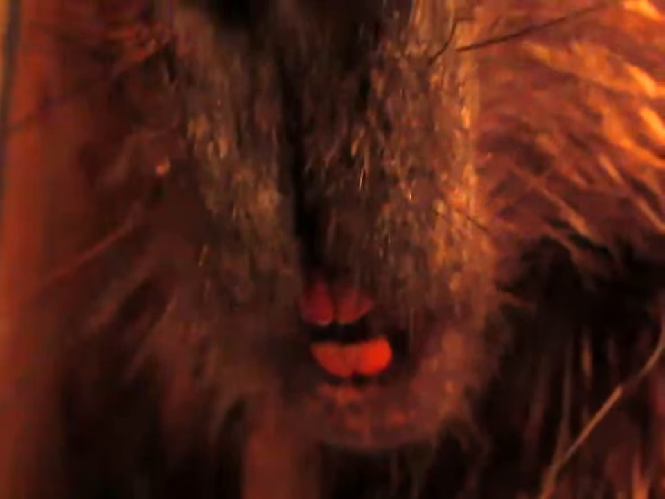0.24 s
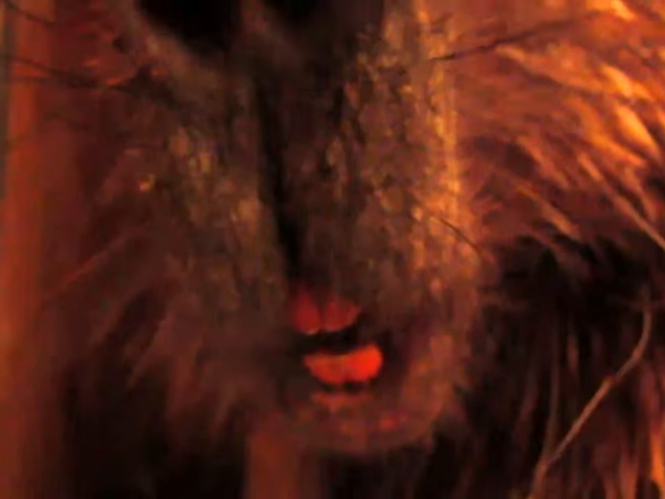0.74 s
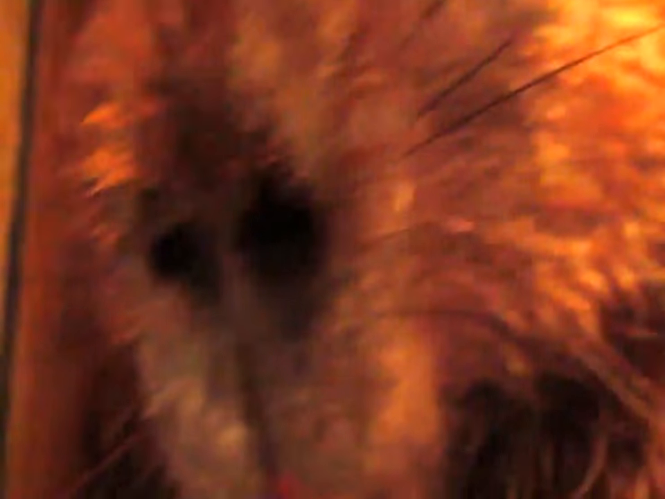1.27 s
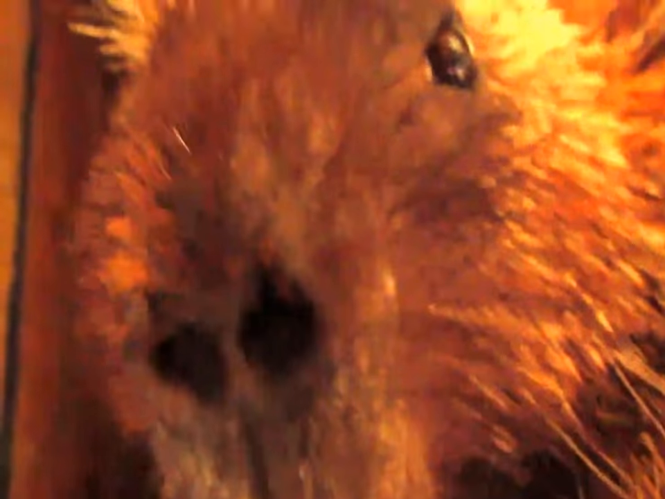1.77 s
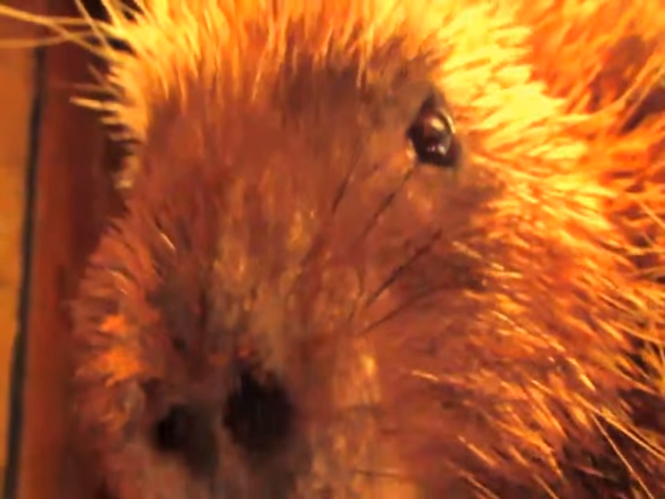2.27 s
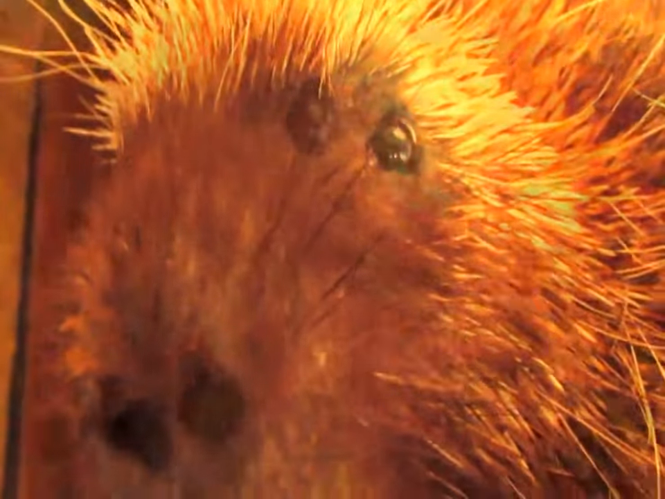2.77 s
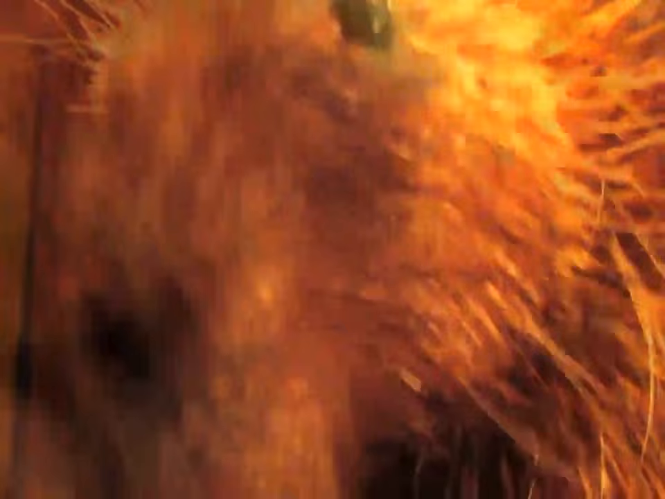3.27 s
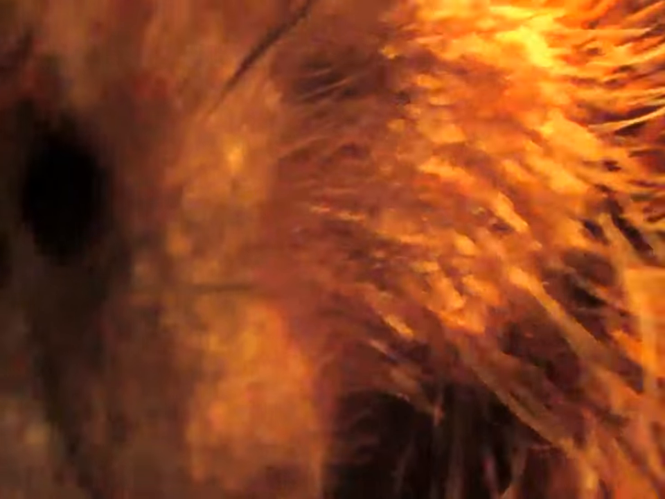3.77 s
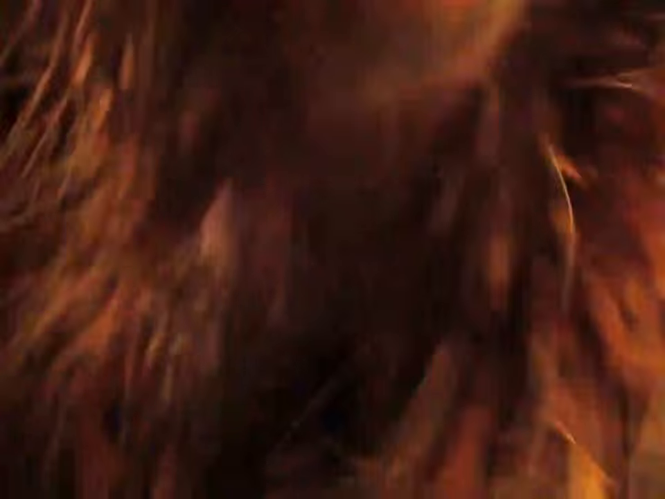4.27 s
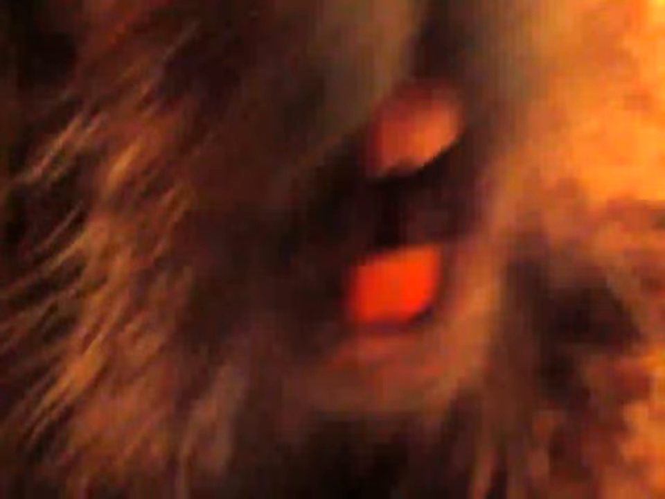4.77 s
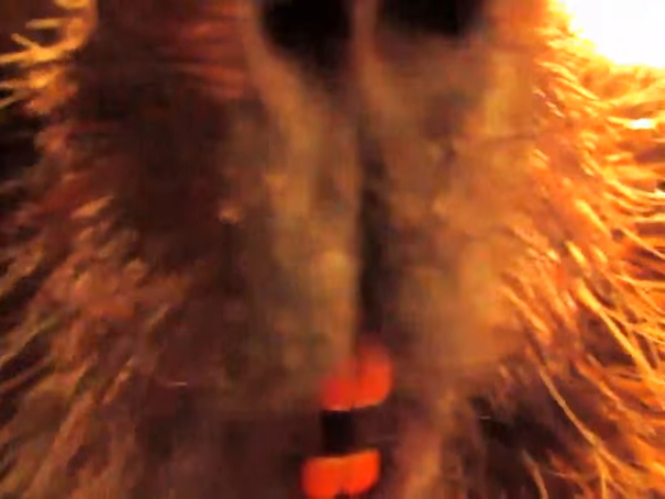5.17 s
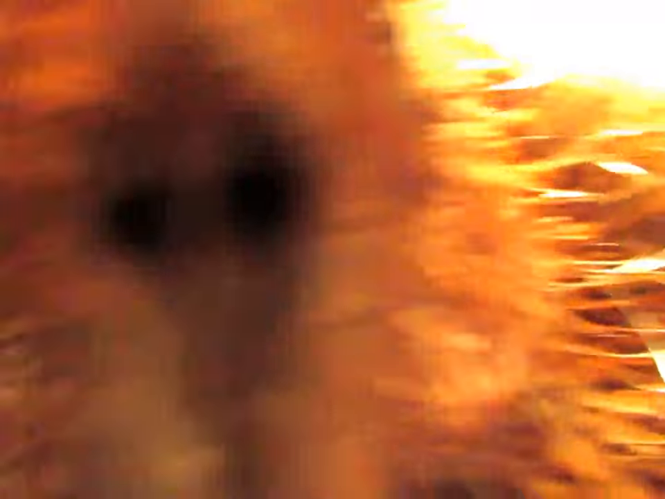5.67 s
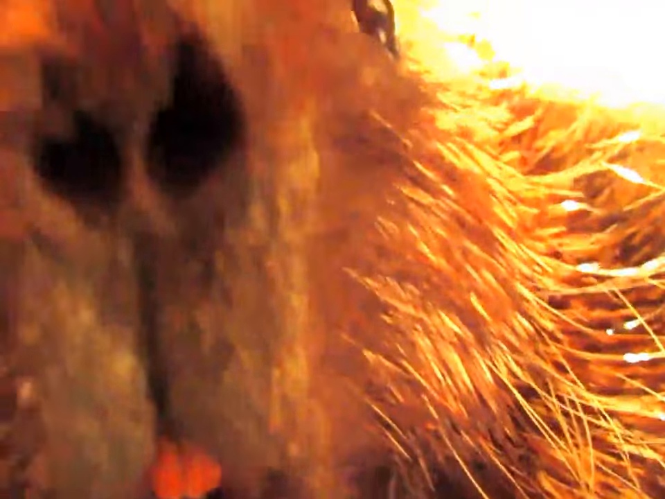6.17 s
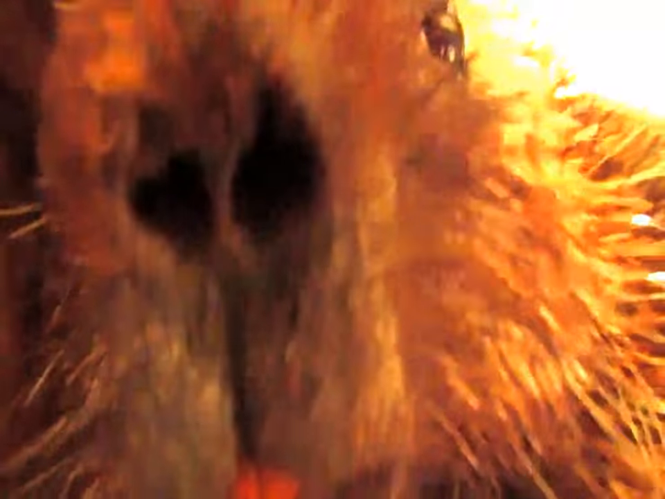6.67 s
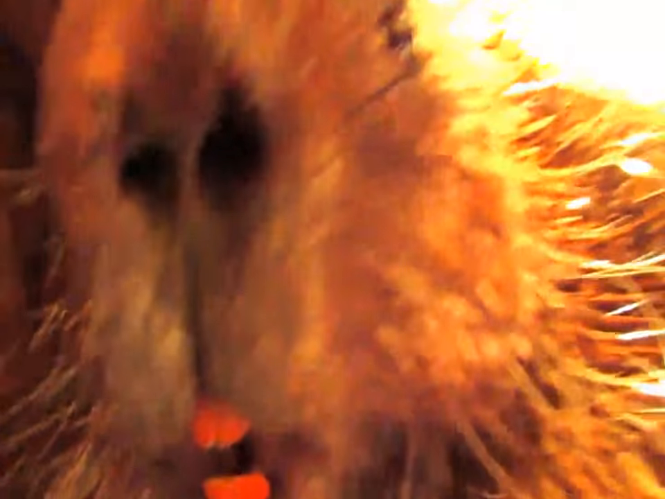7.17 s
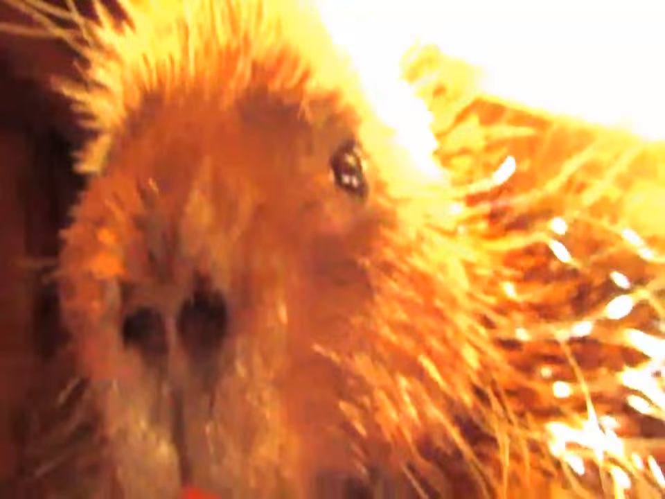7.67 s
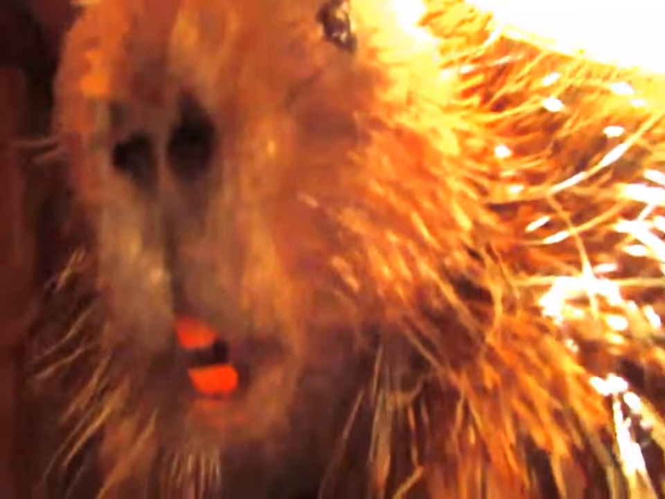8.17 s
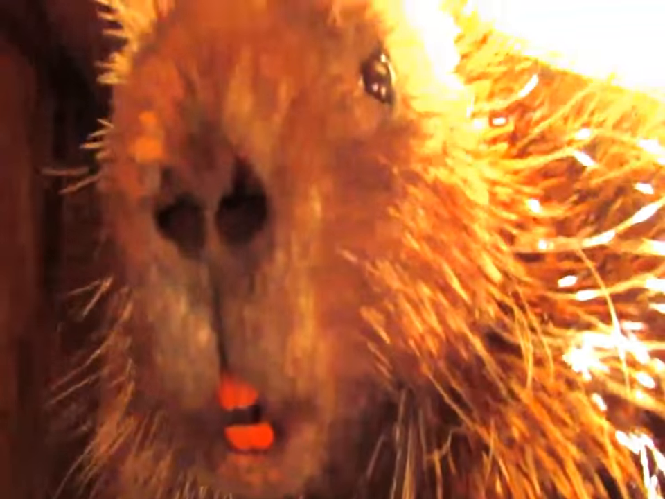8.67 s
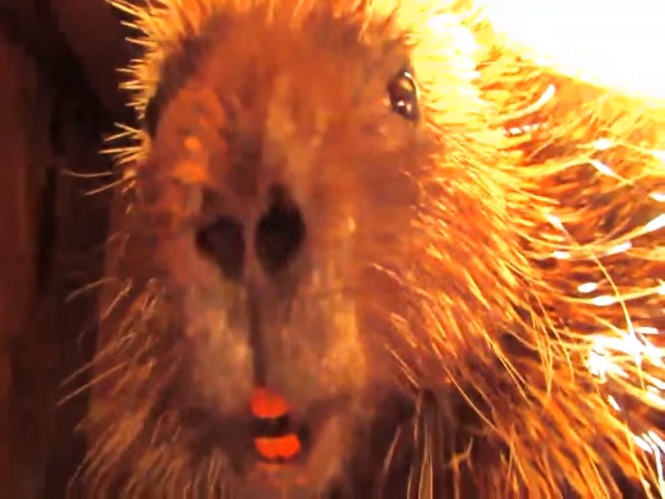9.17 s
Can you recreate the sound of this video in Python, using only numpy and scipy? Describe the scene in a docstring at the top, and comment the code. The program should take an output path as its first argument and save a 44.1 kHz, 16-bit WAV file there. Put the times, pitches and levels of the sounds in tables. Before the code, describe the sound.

Nine brief falling whines from a porcupine in a small wooden shed, each led by a breathy puff, over quiet air and faint birdsong.

```python
"""Porcupine crying in a shed

A porcupine cries nine times close by in a small wooden shed. Vocal-fold pulses squeal, break downward and settle
into a buzz that dies away, shaped by a mouth that is wider or narrower from cry to cry. Shaped noise makes a puff
before each cry, one sniff and the rustle of quills. Gliding tones make the birds outside, and narrow noise bands
a far motor. Small dry ticks and steady air lie behind; a gain control ducks on loud peaks and creeps back."""
import sys
import numpy as np
from scipy import signal
from scipy.fft import rfft, irfft, next_fast_len
from scipy.io import wavfile
from scipy.ndimage import uniform_filter1d, minimum_filter1d, map_coordinates

SR = 44100
rng = np.random.default_rng(int(sys.argv[2]) if len(sys.argv) > 2 else 0)


def waveform_to_disk(signal):
    """Save audio, clipped to [-1, 1], as 16-bit WAV at the path in sys.argv[1]."""
    frames = np.transpose(np.atleast_2d(signal))
    scaled = np.clip(frames, -1, 1) * 32767
    samples = np.round(scaled).astype(np.int16)
    wavfile.write(sys.argv[1], SR, samples)


N = 415863  # length in samples
TOP_HZ = 15800  # nothing sounds above this


def amp(db):
    """Turn decibels into a plain factor."""
    return 10 ** (np.asarray(db) / 20)


def unit(x):
    """Scale to an average (RMS) strength of one."""
    return x / np.sqrt(np.mean(x ** 2) + 1e-20)


def along(points, hz):
    """Read a curve of (f/Hz, value) points, joined on a log frequency axis."""
    f, v = np.transpose(points)
    return np.interp(np.log(hz + 1), np.log(f + 1), v)


def stretch(rows):
    """Sample numbers from the first time to the last, and a smooth curve for each column after the time."""
    s, *cols = np.transpose(rows)
    i = np.arange(round(s[0] * SR), min(round(s[-1] * SR), N))
    return i, [np.interp(i / SR, s, c) for c in cols]


def wobble(n, rate):
    """A smooth random curve with rate random knots a second."""
    knots = rng.standard_normal(int(n * rate / SR) + 4)
    return map_coordinates(knots, [np.arange(n) * rate / SR])


def filtered(x, response):
    """Change the strength and phase of each frequency by a response curve."""
    n = x.shape[-1]
    m = next_fast_len(n + 8192)
    return irfft(rfft(x, m) * response(np.fft.rfftfreq(m, 1 / SR)), m)[..., :n]


def fade(n, s):
    """A soft start and end of s seconds."""
    to_edge = np.minimum(np.arange(n), np.arange(n)[::-1])
    return np.clip(to_edge / (s * SR), 0, 1)


def tail(x, t60, gap_s):
    """Dense echoes that fall 60 dB in t60 seconds, different on left and right."""
    t = np.arange(SR // 2) / SR
    h = rng.standard_normal((2, len(t))) * amp(-60 * t / t60) * (t > gap_s)
    return signal.fftconvolve(x[None], h / np.linalg.norm(h[0]), axes=1)[:, :N]


def dips(rows):
    """Anti-resonances: each row (f/Hz, width/Hz, depth/dB) swallows sound around its frequency."""
    def response(f):
        cuts = []
        for c, w, db in rows:
            away = c * c - f * f
            cuts.append((away + 1j * f * w * amp(db)) / (away + 1j * f * w))
        return np.prod(cuts, axis=0)
    return response


# tone of the shed air and distant rumble: f/Hz, relative level/dB per Hz
AIR_TONE = [(12, -42.5), (20, -17), (76, 1.5), (147, -5), (337, -9.5), (421, -11), (674, -11.5),
            (733, -4.5), (818, -12), (3460, -22), (3970, -24), (5380, -23.5), (11100, -30.5),
            (12400, -33.5), (15000, -66.5)]
# how alike left and right are, negative where they oppose: f/Hz, likeness (-1 to 1)
LEFT_RIGHT_LIKENESS = [(60, -0.02), (130, -0.48), (290, -0.75), (640, -0.64), (1410, -0.5), (3100, -0.21),
                       (6820, 0.05), (15000, -0.03)]
AIR_DB = -55.5  # middle of its slow wander


def shed_air():
    """Steady noise with faint patches, made wide by a sum and a difference of two independent noises."""
    z = signal.stft(rng.standard_normal((2, N)), nperseg=512)[2]
    patches = uniform_filter1d(rng.standard_normal(z.shape[1:]), size=6, axis=0)
    patches = uniform_filter1d(patches, size=14, axis=1)
    pair = signal.istft(z * amp(0.43 * unit(patches)), nperseg=512)[1][:, :N]

    def mid_side(hz):
        turn = np.arccos(np.clip(along(LEFT_RIGHT_LIKENESS, hz), -1, 1)) / 2
        return amp(along(AIR_TONE, hz)) * [np.cos(turn), np.sin(turn)] / np.cos(turn)

    mid, side = filtered(pair, mid_side)
    scale = amp(AIR_DB + 1.2 * wobble(N, 1.5)) / np.std(mid)
    return scale * np.array([mid + side, mid - side])


# how the far motor comes and goes, before a common lift: t/s, level/dB
MOTOR_LEVEL = [(0.0, -74.5), (0.6, -70.5), (1.1, -65.5), (2.5, -67.5), (3.03, -68.5), (3.6, -77),
               (4.2, -67)]
# bands of the motor hum: f/Hz, width/Hz, relative level/dB
MOTOR_BANDS = [(120, 25, -4.5), (221, 7.7, -4.5), (325, 16, -11.5), (930, 60, -14)]
MOTOR_LIFT_DB = 7.5


def drone():
    """A far motor hums as narrow bands of noise at its orders."""
    i, (db,) = stretch(MOTOR_LEVEL)

    def bands(f):
        return sum(amp(level) / (1 + (2 * (f - hz) / w) ** 2) for hz, w, level in MOTOR_BANDS)

    hum = unit(filtered(rng.standard_normal(len(i)), bands))
    soft_end = fade(len(i) + 9999, 0.0996)[9999:]
    x = np.zeros(N)
    x[i] = amp(db + MOTOR_LIFT_DB) * hum * soft_end
    return x


# small dry ticks: t/s, peak level/dB, centre f/Hz
TICK_ROWS = [(0.1294, -46.5, 3230), (0.9894, -54, 1638), (1.309, -44, 3280), (2.7598, -44, 2450),
             (2.8942, -45, 3290), (3.7193, -38.5, 2900), (3.9194, -41.5, 1700), (4.6592, -61, 1580),
             (4.7494, -64, 1540), (5.0845, -55, 1580), (6.0996, -36.5, 1970), (7.1477, -28, 1940),
             (7.2199, -45, 2170), (7.3494, -53, 1860), (7.4987, -46, 1590)]


def ticks():
    """Each tick is a burst of noise that dies in milliseconds, rung around its own centre."""
    x = np.zeros((2, N))
    t = np.arange(400) / SR
    for s, db, hz in TICK_ROWS:
        burst = rng.standard_normal((2, 400)) * amp(-60 * t / 0.0068)
        crack = filtered(burst, lambda f: 1j * f * hz / (hz * hz - f * f + 1.4j * f * hz))
        x[:, round(s * SR):][:, :400] += amp(db) * crack / np.abs(crack).max()
    return x


# one list of pitch points per bird note: t/s, f/Hz
BIRD_NOTES = [
    [(0.0, 4940), (0.062, 3175), (0.118, 3230), (0.176, 3460), (0.2, 3160)],
    [(0.76, 8140), (0.8, 8700), (0.862, 9040), (0.978, 9210), (1.12, 8330), (1.2, 7755)],
    [(1.13, 5394), (1.15, 5010), (1.17, 4943)],
    [(1.2, 6174), (1.228, 3700), (1.25, 3030), (1.28, 2398), (1.314, 3340), (1.355, 3710)],
    [(1.365, 4462), (1.391, 4520), (1.421, 4354), (1.439, 3740), (1.49, 3710)],
    [(1.72, 2870), (1.754, 2432), (1.77, 2120)],
    [(1.79, 2845), (1.807, 3670), (1.822, 4280)],
    [(1.85, 4450), (1.86, 3668), (1.9, 3370)],
    [(3.59, 3040), (3.612, 3576), (3.655, 2650)],
    [(4.0, 3330), (4.052, 2980), (4.114, 2940), (4.13, 3010)],
    [(6.14, 3072), (6.192, 3063), (6.236, 3550), (6.26, 3716), (6.31, 3330)],
    [(6.315, 3450), (6.329, 4430), (6.359, 5710), (6.385, 4610), (6.42, 4510)],
    [(6.22, 8500), (6.368, 8920), (6.472, 9030), (6.6, 8400)],
    [(7.96, 4530), (7.99, 4494)],
    [(8.0, 4760), (8.048, 3880), (8.078, 2875), (8.09, 2788)],
    [(8.14, 2830), (8.162, 3250), (8.23, 3425), (8.26, 3550)],
]
# strength of each note before carry and swell: level/dB
NOTE_LEVELS = [-59.5, -69, -62.5, -54, -57, -54, -54.5, -56.5, -53.5, -50.5, -48.5, -56.5, -67, -61, -47,
               -52]
# which pitches reach into the shed: f/Hz, level/dB
CARRY = [(2200, -7), (2900, -0.76), (3600, 0.17), (4100, -8.5), (4500, -3), (5600, -10), (9000, -9.5)]
NOTE_EDGE_DB = 6  # softer away from the early peak


def birds():
    """Whistled tones with a rough burr swell and sink, blurred by echoes outdoors."""
    x = np.zeros(N)
    for rows, db in zip(BIRD_NOTES, NOTE_LEVELS):
        i, (hz,) = stretch(rows)
        n = len(i)
        turn = 2 * np.pi * np.cumsum(hz * (1 + .006 * wobble(n, 250))) / SR
        burr_db = 2.5 * wobble(n, 150)
        swell_db = -NOTE_EDGE_DB * np.linspace(-.4, 1.2, n) ** 2 + 3 * wobble(n, 30)
        level_db = db + along(CARRY, hz) + swell_db + burr_db
        x[i] += amp(level_db) * np.sin(turn) * fade(n, .006)
    return x * amp([[2.5], [1.5]]) + amp(5.5) * tail(x, t60=0.35, gap_s=0.0033)


def shaped_hiss(rows, tone):
    """Noise with a given tone, its level following (t/s, level/dB) points and trembling a little."""
    x = np.zeros(N)
    i, (db,) = stretch(rows)
    hiss = filtered(rng.standard_normal(len(i)), lambda f: amp(along(tone, f)))
    x[i] = amp(db + 1.5 * wobble(len(i), 25)) * unit(hiss) * fade(len(i), 0.018)
    return x


# quills drag on wood: t/s, level/dB
RUSTLE_LEVEL = [(2.5, -38.5), (3.63, -58), (3.764, -49.5), (3.85, -64)]
# tone of the dragging quills: f/Hz, relative level/dB per Hz
QUILL_TONE = [(59, -39.5), (100, -22), (415, 5.5), (631, -15.5), (756, -0.5), (1060, -14.5), (3010, -19),
              (3910, -23.5), (12000, -32), (15600, -61.5), (22000, -120)]


def rustle():
    """Quills dragging on wood make a noise coloured by what they rub."""
    return shaped_hiss(RUSTLE_LEVEL, QUILL_TONE)


# the sniff swells and fades: t/s, level/dB
SNIFF_LEVEL = [(5.26, -70.5), (5.36, -57.5), (5.612, -53.5), (5.73, -69)]
# tone of air in the nose: f/Hz, relative level/dB per Hz
NOSE_TONE = [(180, -41.5), (300, -10.5), (502, -8.5), (639, -21), (726, 3), (1030, -16), (1730, -25),
             (1880, -5.5), (2310, -28.5), (3140, -7), (3990, -28), (5880, -18), (14000, -25.5)]


def sniff():
    """Air rushing through the nose is noise coloured by its passages."""
    return shaped_hiss(SNIFF_LEVEL, NOSE_TONE)


# resonances of throat and mouth, and near 300 Hz of the shed: f/Hz, width/Hz, level/dB, change when
# narrowed/dB, change when spread/dB
MOUTH_RESONANCES = [(175, 46, -22, 2.5, 0.3), (300, 60, -8.5, -5.5, -2.63), (750, 130, -18.5, 3, -0.5),
                    (1200, 180, -4, -7, -0.83), (1760, 150, 0.7, 0.57, -0.6), (2163, 320, -5, -2.06, -0.3),
                    (3239, 300, 2.5, -10, 2.3), (4350, 780, -6, -7.5, 3.5), (5613, 1200, -11, -6, 3.5),
                    (6200, 160, -25, -0.1, -0.6), (7300, 170, -18, 1.9, -0.14)]
# side pockets of the nose cancel sound: f/Hz, width/Hz, depth/dB
NOSE_NOTCHES = [(444, 120, -4), (2590, 98, -13), (6130, 250, -9)]


def mouth(narrow, spread):
    """Throat and mouth ring at their resonances and the shed rings near 300 Hz, while pockets of the nose take
    some sound away."""
    def response(f):
        total = 0
        for k, (c, w, db, narrow_db, spread_db) in enumerate(MOUTH_RESONANCES):
            level = amp(db + narrow * narrow_db + spread * spread_db)
            total = total + (-1) ** k * level * 1j * f * w / (c * c - f * f + 1j * f * w)
        return dips(NOSE_NOTCHES)(f) * total / (1 + 1j * f / 9000) ** 2
    return response


def teeth(f):
    """Hiss that slips past the teeth is mostly treble."""
    return f / (f + 6000) / (1 + (f / 12500) ** 6)


# brightness at start, squeal, break, buzz, release and end, before each cry's own tilt: slope/dB per octave
STAGE_BRIGHTNESS = [-5, -4.5, 0, -0.5, -1.92, -4]
ATTACK_S, ATTACK_BEND = .01, 3.7  # the folds reach full swing, slowly at first
SETTLE_WIDTHS = 4.7  # break widths until the buzz
BUZZ_FADE_DB_PER_S, RELEASE_DB = 40, 24.5  # slow fade of the buzz; loss in the release
SQUEAL_BREATHY, LAST_BREATHY = 0.04, 0.49  # breathy share 0-1 of the squeal; least share at the end
BRIGHT_PER_DB = .22  # a harder swell into the break brightens it (dB per octave for each dB)


def gesture(t, fall, width, release, squeal_db, break_db, buzz_db, break_breathy, buzz_breathy):
    """Effort of the folds: gain, brightness and breathy share through squeal, break, buzz and release."""
    length = t[-1]
    settled = min(fall + SETTLE_WIDTHS * width, length - release)
    stages = [0, ATTACK_S, fall - width, settled, length - release, length]
    faded_db = buzz_db - BUZZ_FADE_DB_PER_S * (stages[4] - settled)
    db = np.interp(t, stages[1:], [squeal_db, break_db, buzz_db, faded_db, faded_db - RELEASE_DB])
    gain = amp(db) * np.clip(t / ATTACK_S, 0, 1) ** ATTACK_BEND
    around_break = np.exp(-((t - fall) / (1.2 * width)) ** 2)
    bright = np.interp(t, stages, STAGE_BRIGHTNESS)
    bright = bright + BRIGHT_PER_DB * (break_db - squeal_db) * around_break
    last_breathy = max(LAST_BREATHY, buzz_breathy)
    shares = [SQUEAL_BREATHY, break_breathy, buzz_breathy, buzz_breathy, last_breathy]
    return gain, bright, np.clip(np.interp(t, stages[1:], shares), 0, 1)


def fold_pulses(hz, turn, bright, breathy):
    """Vocal folds snapping shut give a row of harmonics, weaker at the top when they close gently."""
    k = np.arange(1, 90)[:, None]
    octaves = np.log2(k * hz / 1800)
    # gentle closure loses the top fastest
    soft = 0.27 * np.clip(-bright, 0, None) * np.clip(octaves, 0, None) ** 2
    slope = amp(bright * octaves - soft) * (k * hz < TOP_HZ)
    pulses = -(slope * np.cos(k * turn)).sum(0) * np.sqrt(hz / 300)  # equal power per Hz at any pitch
    return pulses * amp(8 * breathy * wobble(len(hz), 200))


def fold_air(turn):
    """Air hisses between the folds once a cycle; its turbulence differs between left and right."""
    a, b = rng.standard_normal((2, len(turn)))
    return 4.9 * np.array([a + b, a - 0.82 * b]) * (1 + np.cos(turn))


BLAST_DB, LEAK_DB = -51.5, -14  # low breath blast re the voice; factor on the hiss past the teeth


def cry(hz, gain, bright, breathy, chest_db, pan_db, mouth_response):
    """Fold pulses and air pass the mouth, joined by hiss at the teeth, a breath blast and a chest hum."""
    n = len(hz)
    turn = 2 * np.pi * np.cumsum(hz * (1 + 0.025 * breathy * wobble(n, 250))) / SR
    pulses = fold_pulses(hz, turn, bright, breathy)
    air = fold_air(turn)
    voice = filtered((1 - breathy) * pulses + breathy * air, mouth_response)
    voice = voice + amp(LEAK_DB) * filtered(breathy ** 1.6 * air, teeth)
    blast = filtered(rng.standard_normal((2, n)), lambda f: 1 / (1 + (f / 70) ** 4))
    voice = unit(voice) * amp([[pan_db / 2], [-pan_db / 2]]) + amp(BLAST_DB) * unit(blast)
    # the chest hums along once the pitch is low
    chest = amp(chest_db + 5 * breathy * wobble(n, 35)) * np.sin(turn) / (1 + (hz / 185) ** 6)
    return gain * (voice + chest)


PUFF_RISE_DB, PUFF_LEAK_DB = 19, -14.5  # swell of the puff; factor on its hiss past the teeth


def puff(m, db, mouth_response):
    """Breath before the cry is noise through the same mouth, swelling towards the attack."""
    def tone(f):
        return mouth_response(f) * (f / 3000) ** .2 + amp(PUFF_LEAK_DB) * teeth(f)

    hiss = unit(filtered(rng.standard_normal(m), tone))
    swell_db = db - PUFF_RISE_DB * (1 - np.arange(m) / m)
    soft_start = fade(2 * m, 0.049)[:m]
    return amp(swell_db) * hiss * soft_start


# pitch of each cry from its start to its end, one list per cry: t/s, f/Hz
CRY_PITCH = [
    [(.397, 697.4), (.41, 729), (.43, 695.1), (.445, 589.5), (.46, 427.8), (.475, 331), (.495, 273.5),
     (.535, 156.8)],
    [(1.575, 645.7), (1.59, 669.4), (1.61, 605), (1.625, 472), (1.638, 350.6), (1.65, 278.8), (1.685, 239)],
    [(2.347, 692), (2.36, 712), (2.39, 603), (2.41, 491.3), (2.425, 375.5), (2.45, 299.4), (2.48, 260.4),
     (2.535, 212.7), (2.56, 139.6)],
    [(3.135, 695.5), (3.15, 695.3), (3.17, 614), (3.19, 480), (3.205, 345.3), (3.225, 277.3), (3.25, 234.9),
     (3.285, 234.5), (3.34, 215.1), (3.39, 158)],
    [(4.15, 740.5), (4.165, 866.5), (4.195, 909.1), (4.21, 882), (4.225, 680.6), (4.252, 262.7),
     (4.275, 192.8), (4.32, 178.2), (4.345, 147.4), (4.42, 120)],
    [(5.872, 697.7), (5.881, 726.7), (5.9, 682.2), (5.912, 597.4), (5.932, 331.8), (5.945, 255.1),
     (5.965, 227)],
    [(6.648, 681.7), (6.67, 684.8), (6.69, 603.3), (6.72, 402), (6.74, 322.2), (6.76, 270.5), (6.785, 223),
     (6.83, 155.4)],
    [(8.304, 587.3), (8.313, 601), (8.33, 534.6), (8.35, 344.5), (8.36, 311.2), (8.375, 305.3),
     (8.39, 240.3)],
    [(9.213, 735), (9.235, 718.2), (9.25, 685.8), (9.265, 599.7), (9.28, 460.6), (9.3, 341.8),
     (9.325, 276.7), (9.35, 241.4), (9.385, 245.7), (9.47, 193.1)],
]
# one row per cry: break after t/s, break width/s, release/s, squeal level/dB, break level/dB, buzz level/dB,
# breathy share of the break (0-1), of the buzz (0-1), chest hum level re the cry/dB at low pitch,
# left over right/dB, added brightness/dB per octave, mouth narrowing, lip spread, puff length/s, puff end level/dB
CRY_SHAPES = [ (0.064, .011, .04, -6.5, -5, -9, .17, 0.4, -10, 2.5, .1, 0.01, -.2, .115, -45),
              (0.059, 0.011, .025, -13.5, -5, -18.5, .28, .2, -12, -1.4, -0.34, 0.01, 0.041, .175, -47),
              (0.095, 0.014, .035, -10.5, -0.5, -8.5, 0.2, .1, -3, 0.2, -0.47, -0.14, 0.77, .105, -45.5),
              (.056, 0.016, .035, -9, -9, -17.5, .15, 0.2, -2.5, 0.26, 0.23, -0.015, .4, .085, -39.5),
              (.082, 0.012, .04, -7, 9, -18.5, .25, .55, -6, -1.5, -1.16, 1.25, 0.72, .1, -36.5),
              (0.052, .008, .018, -3.5, -6, -27.5, .25, .15, -11.5, 2.5, -1.12, 0.03, .1, .15, -47),
              (0.071, .015, .05, -11.5, -3, -13, .17, 0.2, -10, 0.2, .1, .55, .9, .078, -43.5),
              (0.037, .007, .024, -13.5, -7.5, -26, 0.3, 0, -12, 0.8, -1.26, -.1, -.6, .14, -43.5),
              (0.073, .014, .03, -6, -4, -11.5, .15, 0.1, -1.5, -0.14, .1, 0.1, .3, .11, -44), ]


def porcupine():
    """Each cry and the puff that leads in share one shape of the mouth."""
    out = np.zeros((2, N + SR))
    for pitch, row in zip(CRY_PITCH, CRY_SHAPES):
        *shape, chest_db, pan_db, tilt, narrow, spread, puff_s, puff_db = row
        s, knots = np.transpose(pitch)
        t = np.arange(round((s[-1] - s[0]) * SR)) / SR
        hz = np.interp(t + s[0], s, knots)
        start = round(s[0] * SR)
        gain, bright, breathy = gesture(t, *shape)
        mouth_response = mouth(narrow, spread)
        voice = cry(hz, gain, bright + tilt, breathy, chest_db, pan_db, mouth_response)
        out[:, start:start + len(t)] += voice
        m = round(puff_s * SR)
        puff_end = start + round(ATTACK_S * SR)  # the puff runs on under the attack
        out[:, puff_end - m:puff_end] += puff(m, puff_db, mouth_response)
    return out[:, :N]


# echoes from the shed walls: delay/ms, left level/dB, right level/dB
WALL_ECHOES = [(1.1, -12.5, -16.5), (1.9, -22.5, -12), (3.1, -16, -23), (4.3, -22.5, -15.5),
               (5.9, -19, -22.5), (7.7, -23, -15)]


def scene():
    """The animal sounds with their shed echoes, over birds, ticks, motor and air."""
    animal = porcupine() + sniff() + rustle()
    near = animal.mean(0)
    walls = 0
    for ms, left_db, right_db in WALL_ECHOES:
        late = np.pad(near, (round(ms * SR / 1000), 0))[:N]
        walls = walls + amp([[left_db], [right_db]]) * late
    # quills and boards close by scatter the treble
    scatter = filtered(tail(near, t60=.025, gap_s=.0003), lambda f: 1j * f / (5000 + 1j * f))
    shed = amp(1.0) * scatter + amp(-10) * tail(near, t60=0.084, gap_s=0.0077)
    return amp(-1.0) * animal + walls + shed + birds() + ticks() + drone() + shed_air()


# dips of the microphone housing: f/Hz, width/Hz, depth/dB
HOUSING_DIPS = [(3990, 240, -12.5), (8100, 230, -9)]
DUCK_ABOVE_DB, CLIMB_DB_PER_S = .6, 16  # peak level that ducks the gain; gain won back per second


def record(dry):
    """Housing dips and a falling top; gain drops on loud peaks, holds, climbs back; soft clip; band limit."""
    dry = filtered(dry, lambda f: dips(HOUSING_DIPS)(f) / (1 + (f / 14500) ** 8))
    t = np.arange(N) / SR
    over_db = 20 * np.log10(np.abs(dry).max(0) + 1e-9) - DUCK_ABOVE_DB
    held_db = -minimum_filter1d(-over_db, size=9001, origin=4400)  # hold each peak about 0.2 s
    climb = CLIMB_DB_PER_S * t
    cut_db = np.clip(np.maximum.accumulate(held_db + climb) - climb, 0, None)
    x = dry * amp(-uniform_filter1d(cut_db, size=401))
    x = x / (1 + np.abs(x) ** 12) ** (1 / 12)
    return filtered(x, lambda hz: hz < TOP_HZ)


dry = scene()
out = record(dry)
waveform_to_disk(out)
```